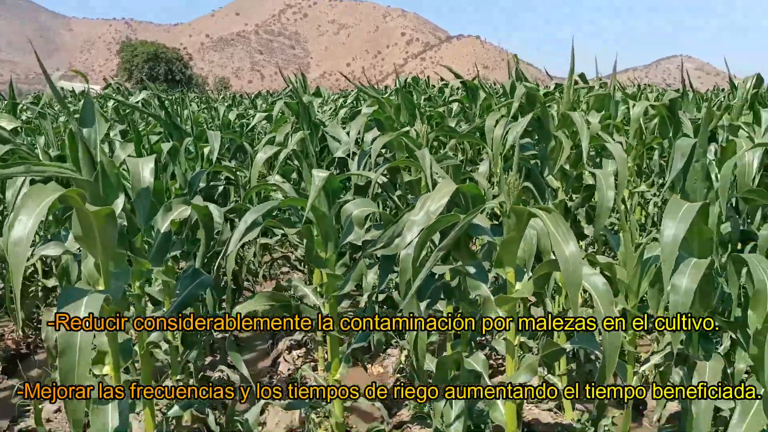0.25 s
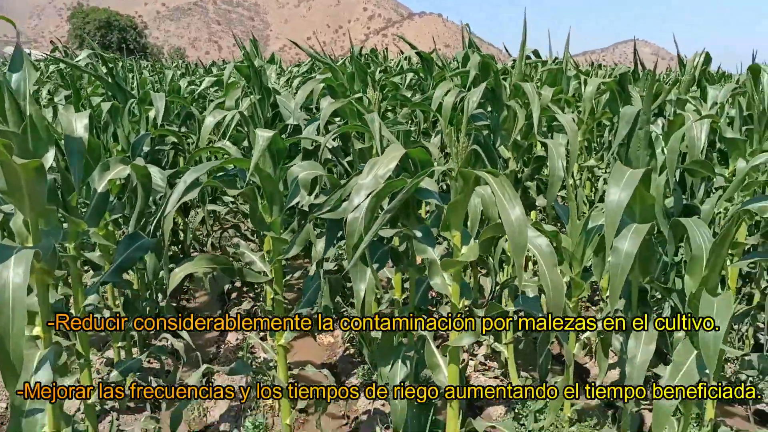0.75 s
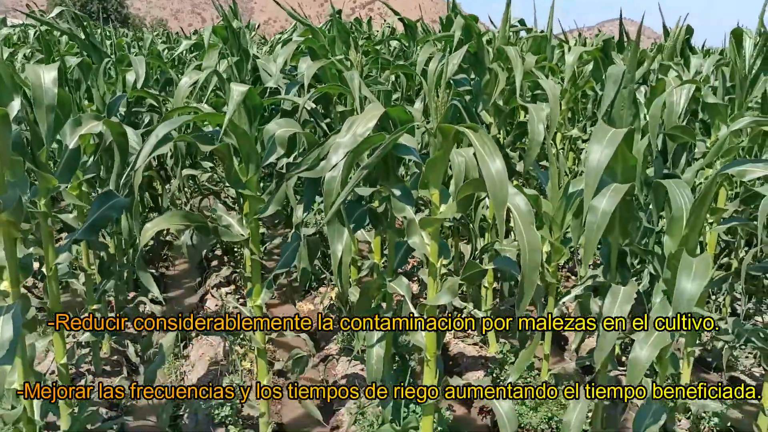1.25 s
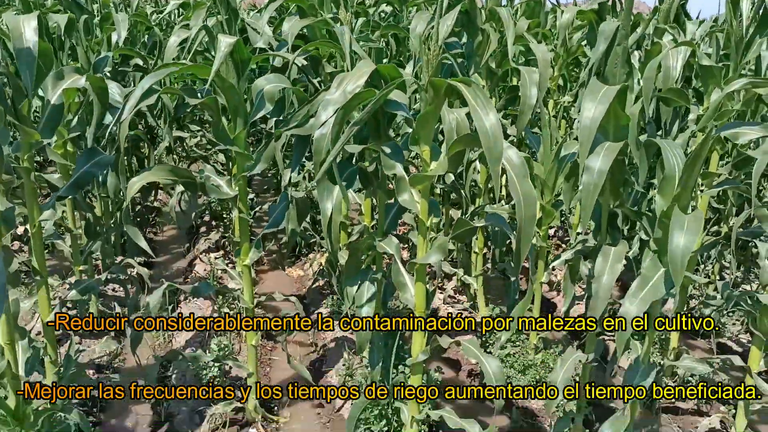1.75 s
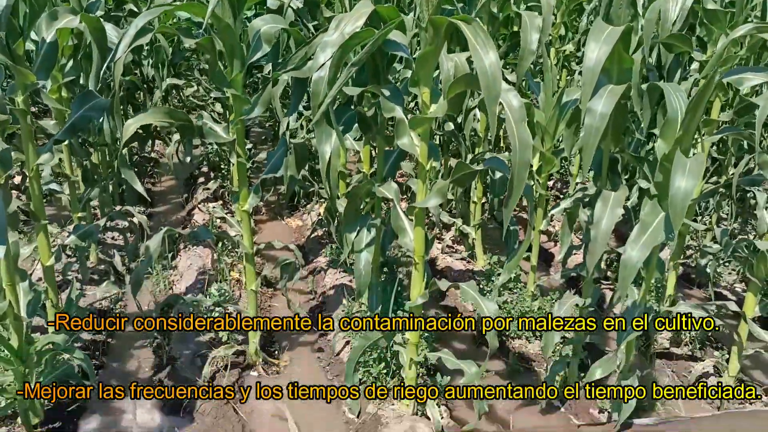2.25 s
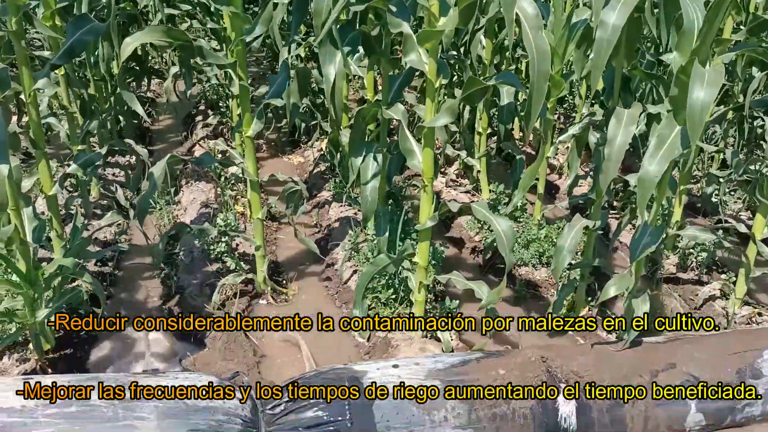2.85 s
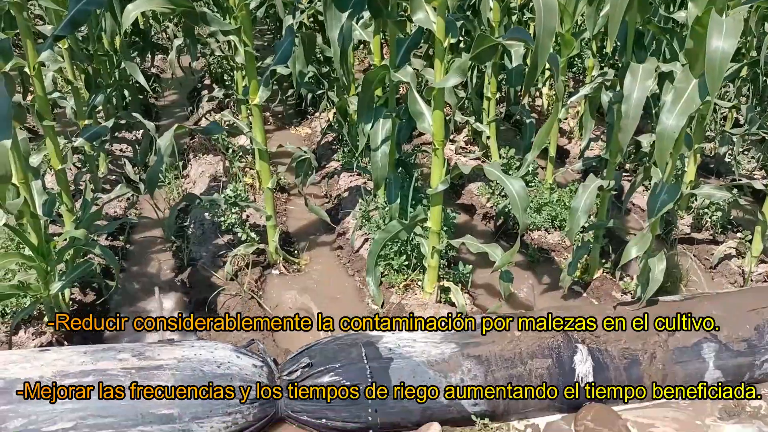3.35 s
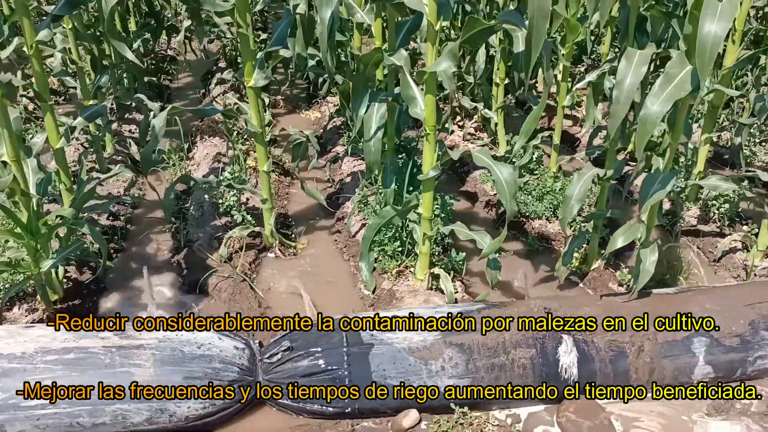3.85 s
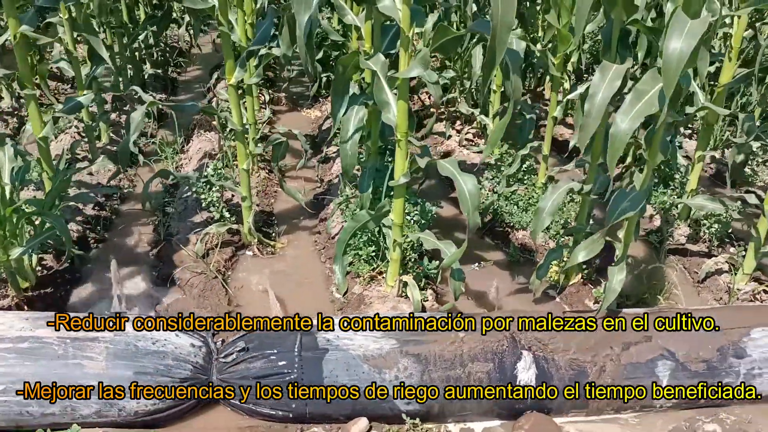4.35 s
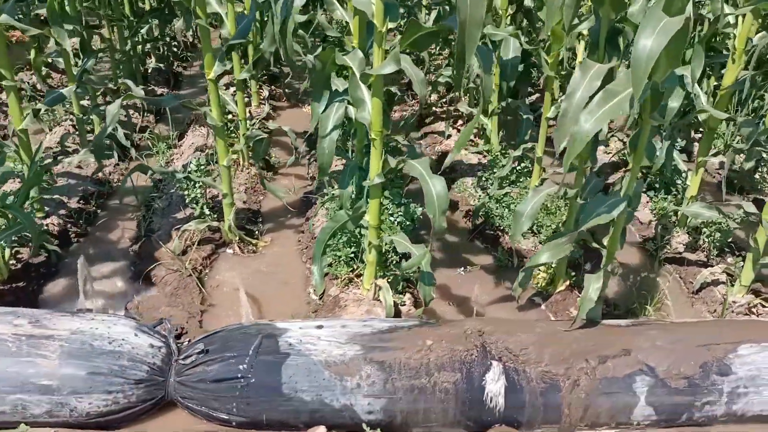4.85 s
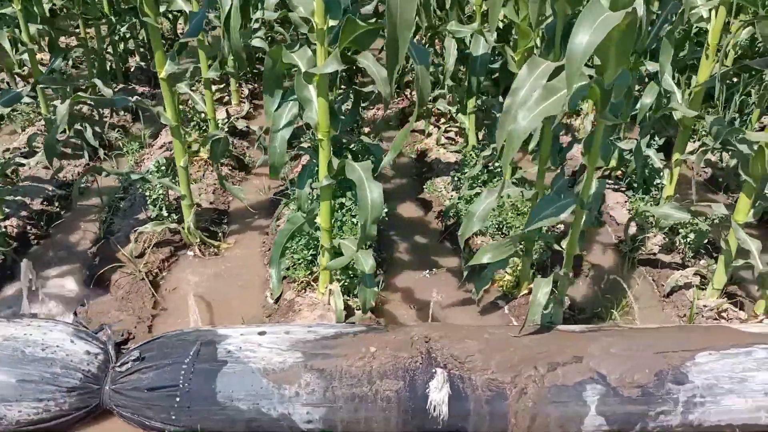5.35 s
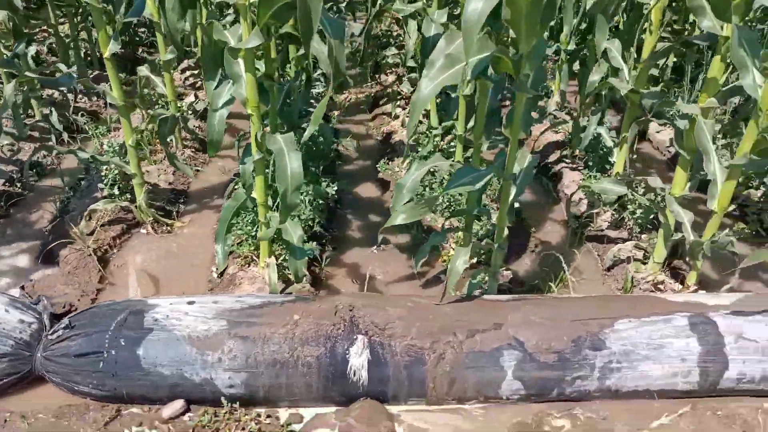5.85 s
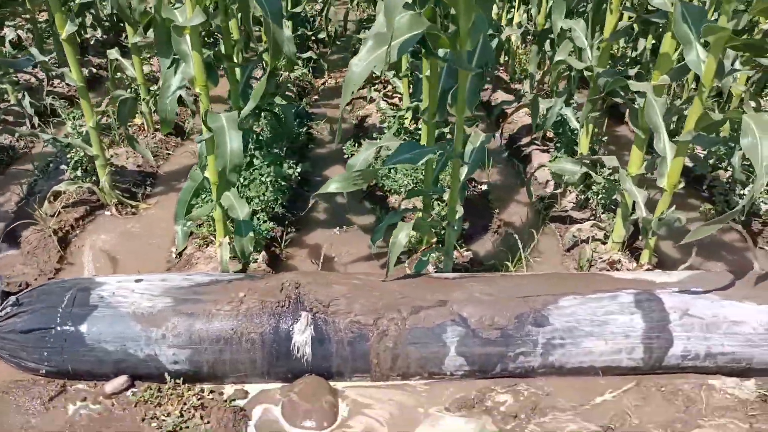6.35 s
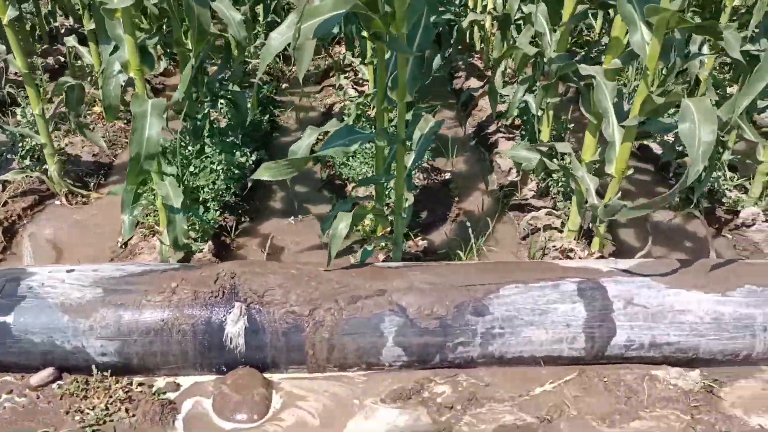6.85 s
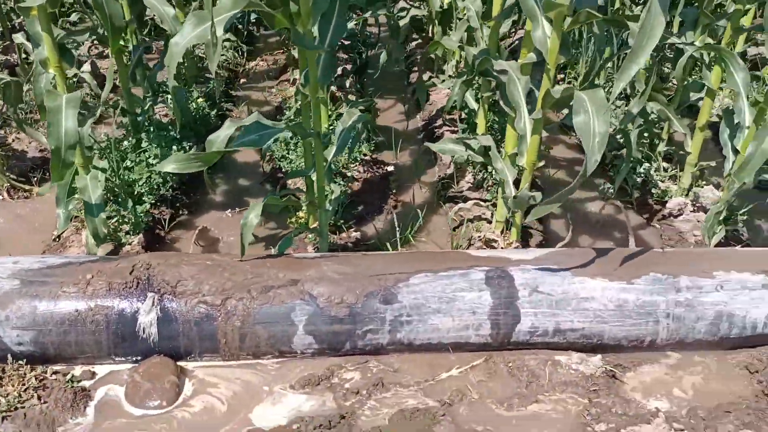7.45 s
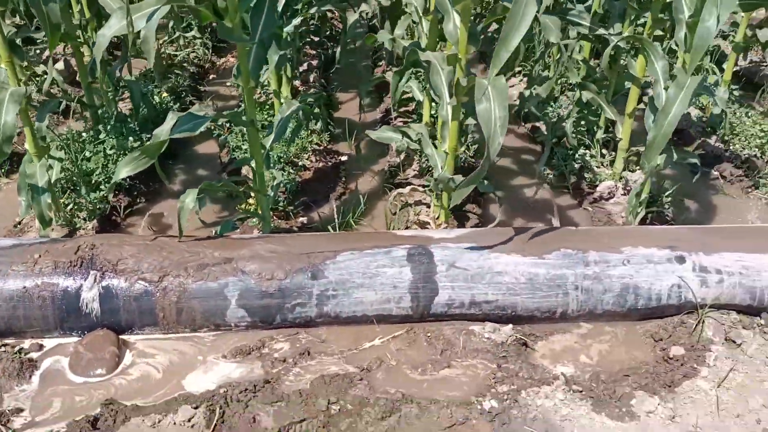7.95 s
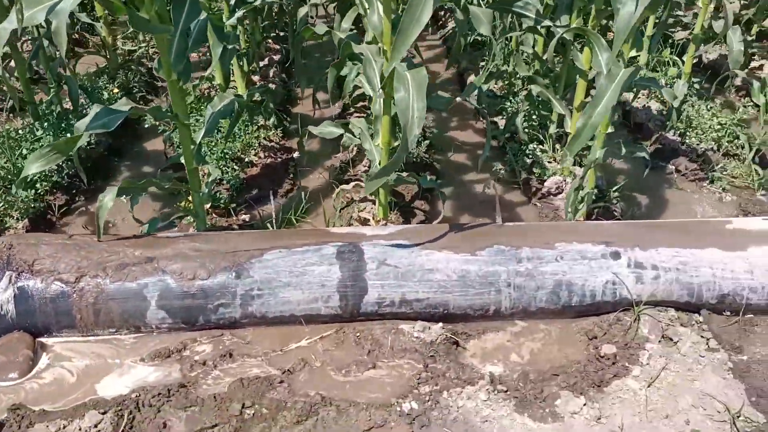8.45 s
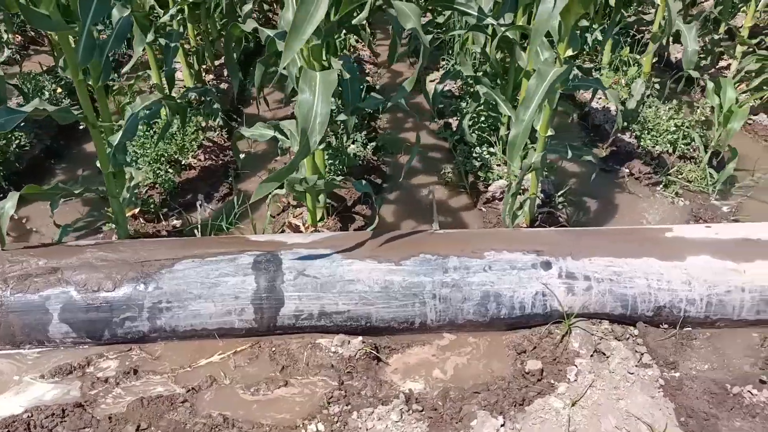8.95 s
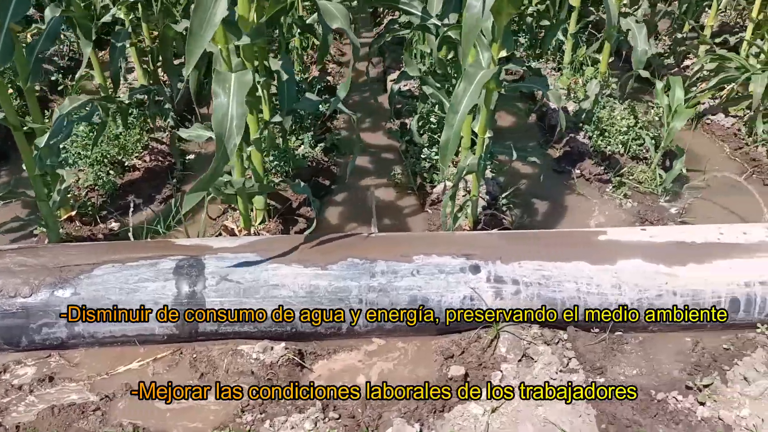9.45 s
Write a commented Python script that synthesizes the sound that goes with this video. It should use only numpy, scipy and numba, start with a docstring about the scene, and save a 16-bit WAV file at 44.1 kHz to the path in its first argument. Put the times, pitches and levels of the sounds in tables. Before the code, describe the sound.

Outdoors in a crop field, water streams continuously from a soft irrigation hose into wet furrows: a bright, fizzy hiss of jets over a dull gurgling wash. Sharp drops smack close to the handheld stereo microphone, mostly on the right. Light wind flutters early; just after the middle, strong gusts thump and rumble in the right channel, then ease while the water keeps running.

```python
"""Watering a maize field on a gusty day

Water runs from the outlets of a soft irrigation hose into the furrows of a maize field.
The jets hiss: shaped noise with tiny clicks, brief splats and small ringing bubbles.
The furrows gurgle with larger bubbles over a dull wash; single drops smack and bubbles plop nearby.
Gusts buffet the two ports of a hand-held microphone, mostly the right one: low rumble and short thumps.
"""
import sys
import numpy as np
from scipy import signal
from scipy.fft import rfft, irfft
from scipy.io import wavfile
from scipy.ndimage import uniform_filter1d
from numba import njit

SR = 44100
rng = np.random.default_rng(int(sys.argv[2]) if len(sys.argv) > 2 else 0)


def generate_wav(signal):
    """Clip the signal to [-1, 1] and save it as 16-bit WAV at the path in sys.argv[1]."""
    frames = np.transpose(np.atleast_2d(signal))
    scaled = np.clip(frames, -1, 1) * 32767
    pcm = np.round(scaled).astype(np.int16)
    wavfile.write(sys.argv[1], SR, pcm)


N = 428211
TIME = np.arange(N) / SR  # seconds
SHORT = 2048  # samples in one drop, splat or thump

# how loud the water is as nearness changes:
# (t/s, jets level/dB, furrows level/dB, extra left-port jets level/dB, finest spray level/dB)
NEARNESS = [(0, 0, 2, 1.5, 1), (1.5, .3, 1, 1.8, -0.1), (3, 0.5, 0.5, 0.6, 1), (4.2, 0.44, 1, 0, -0.5),
            (5.5, 0.5, 1.5, -1, 0.8), (7, 1, -2, -0.3, -1.8), (8.2, -0.06, -2, 0.1, -1),
            (9.35, 0.3, -4, 0, -2.5), (9.55, 1.5, -2.5, -.2, -1.5), (9.71, 1.5, -0.5, -1.5, -4)]
# splashing at each port, before nearness: (f/Hz, left level/dB per Hz, right level/dB per Hz)
SPLASH_SPECTRUM = [(300, -88.5, -83), (865, -83, -82.5), (1400, -79.5, -83), (1700, -76.5, -81),
                   (2160, -72, -74.5), (2450, -74, -78), (3050, -78, -72), (3750, -84, -76.5),
                   (4400, -79.5, -74), (4950, -85, -76), (5470, -75.5, -75.5), (5840, -85.5, -74),
                   (8820, -86, -79), (9600, -88.5, -87.5), (12000, -85.5, -84), (15300, -91, -91.5)]
# water tumbling in the furrows, before nearness: (f/Hz, level/dB per Hz)
FURROW_SPECTRUM = [(30, -75), (110, -85.5), (200, -75), (320, -81.5), (450, -78.5), (580, -77), (780, -80),
                   (1200, -87), (2500, -105)]
# gusts, each catching one port: (port, start t/s, length t/s, arrival level/dB, swell over the length/dB)
GUST_EVENTS = [("right", 0, .02, -37, 0), ("right", .12, .2, -32, 2), ("right", 0.452, .16, -42, 6),
               ("right", 1.24, 0.25, -37, -3.5), ("right", 1.77, .04, -44, 0),
               ("right", 2.99, 0.077, -42, 5), ("right", 3.36, .06, -47, 0), ("left", 3.43, 0.14, -43, 5),
               ("left", 3.6, .23, -48, 8), ("left", 3.94, 0.025, -33, 0), ("right", 4.32, 0.023, -35, 0),
               ("right", 4.445, .135, -30.5, 2), ("left", 4.47, .12, -37, -9),
               ("right", 4.68, .06, -35.5, -2), ("right", 4.93, .1, -43.5, -3),
               ("right", 5.19, .11, -35, 2.8), ("right", 5.395, .135, -17.5, 6.5),
               ("right", 5.56, .17, -17, -3), ("right", 5.77, .1, -11.5, -1), ("right", 5.9, .07, -17, -2),
               ("right", 6.022, .1, -15, -9), ("right", 6.16, .03, -11.5, -3), ("right", 6.24, .15, -24, 0),
               ("right", 6.415, .11, -14, -13), ("left", 6.46, .03, -36, 0), ("right", 6.59, .19, -26, 3),
               ("left", 6.87, 0.036, -24.5, 0), ("right", 6.87, .03, -37, 0),
               ("right", 7.075, .245, -21, 8), ("right", 7.385, .115, -17, 7),
               ("right", 7.53, .17, -15, -3), ("right", 7.73, .05, -16, 2), ("right", 7.86, .2, -23.5, -6),
               ("right", 8.43, .04, -33, 0), ("left", 8.43, 0.037, -26.5, -2),
               ("right", 8.57, .25, -33, 6.2), ("right", 8.88, 0.18, -31, -5),
               ("left", 8.85, 0.037, -29, 0), ("right", 9.13, 0.13, -31, -3), ("right", 9.38, .27, -36, 5),
               ("left", 9.61, .05, -41.5, 0)]
# light breeze between the gusts, right port: (t/s, level/dB)
RIGHT_BREEZE = [(0, -48), (1.1, -49.5), (2.3, -62), (3.1, -56), (4, -63), (5.2, -51), (8.25, -54),
                (9.71, -41)]
# tone of the eddies at a port, only the shape matters: (f/Hz, relative level/dB per Hz)
EDDY_SPECTRUM = [(8, -28), (25, -8), (50, 0), (75, 0), (100, 0), (170, -3), (250, -9.5), (330, -9.5),
                 (450, -9.5), (700, -16), (1500, -16)]
# the loudest nearby drops, as the right port hears them: (t/s, level/dB, f/Hz)
LOUD_DROPS = [(1.67, -15, 4280), (2.123, -21, 4860), (3.039, -12.5, 3980), (3.4, -15, 4460),
              (4.058, -21, 2720), (5.269, -16, 2470), (5.562, -19, 4470), (5.857, -17.5, 3050),
              (6.793, -16.5, 4500), (6.945, -13.3, 4360), (7.097, -19, 3060), (7.898, -17, 5640),
              (7.962, -15, 2810), (8.421, -19, 3570), (8.709, -17.5, 5580), (8.802, -17, 5480),
              (8.871, -16, 4400), (9.092, -20, 3800), (9.133, -16, 3560), (9.192, -22.5, 2610),
              (9.658, -16.5, 5000)]
# bigger bubbles in the nearest puddle: (t/s, starting level/dB, starting f/Hz)
PLOP_BUBBLES = [(.75, -28, 2180), (6.182, -27, 3520), (6.695, -29, 2490), (6.705, -32, 2750),
                (6.831, -33, 1430), (6.835, -29, 2070), (6.91, -33, 595), (7.303, -32, 1090),
                (8.54, -29.5, 1720), (9.1, -28, 2180), (9.189, -31.5, 597), (9.516, -29, 2490),
                (9.535, -31, 1860)]
# single strong eddies that thump the right port: (t/s, level/dB, f/Hz)
STRONG_EDDIES = [(4.571, -18, 130), (5.788, -2, 90), (5.832, 0.5, 110), (6.029, -5, 225), (6.175, -2, 130),
                 (6.316, -11, 128), (6.396, -15, 140), (6.429, -3, 205), (7.1, -4, 119), (7.151, -8, 93),
                 (7.216, -2.5, 99), (7.304, -2, 119), (7.482, 0.5, 100), (8.04, -12.5, 125),
                 (9.212, -15.5, 131), (9.456, -18, 125), (9.542, -18.5, 149)]

LEFT_BREEZE_DB = -59  # the left port is sheltered
GUST_ATTACK_S, GUST_RELEASE_S = 0.013, 0.028  # time constants of the rise and of the dying away
WAKE_DB, WAKE_S = -20, .16  # slack air behind a gust: level against the gust, time constant
DROP_RING_CYCLES = 2.54  # a drop's ring falls to 1/e in this many cycles
PLOP_RING_S = 0.027  # how long each plop rings
TOP_HZ = 15300  # the recorder cuts what lies above


def undb(db):
    """Turn decibels into a multiplier."""
    return 10 ** (np.asarray(db) / 20)


def unit(x):
    """Scale to an average strength (rms) of one."""
    return x / np.sqrt(np.mean(x ** 2))


def curves(rows):
    """Draw each column of a timed table as a line, sample by sample."""
    s, *columns = np.transpose(rows)
    return [np.interp(TIME, s, column) for column in columns]


def walk(rate):
    """Wander smoothly at random, with about `rate` turns a second and an rms of one."""
    k = max(int(SR / rate), 2)
    steps = np.repeat(rng.standard_normal(N // k + 1), k)
    smooth = uniform_filter1d(uniform_filter1d(steps, k), k)
    return unit(smooth[:N])


def colour(x, hz, db):
    """Give white sound of rms one a spectrum in dB per Hz."""
    f = np.arange(N // 2 + 1) * SR / N + 1  # the extra 1 Hz avoids log(0)
    gain = undb(np.interp(np.log(f), np.log(hz), db))
    return irfft(rfft(x) * gain, N) * np.sqrt(SR / 2)


def add(track, s, sound):
    """Mix a short sound in at time s."""
    i = int(np.clip(s * SR, 0, N - 1))
    track[i:i + len(sound)] += sound[:N - i]


@njit
def lowpass(x, hz, damping):
    """Keep what lies below a corner that can move (state-variable filter)."""
    y, band, low = np.empty(len(x)), 0., 0.
    for i in range(len(x)):
        g = np.tan(np.pi * hz[i] / SR)
        v = (band + g * (x[i] - low)) / (1 + g * (g + damping))
        y[i] = low + g * v
        band, low = 2 * v - band, 2 * y[i] - low
    return y


@njit
def ring(starts, hz, cycles, size, glide):
    """Bubbles ring as fading sines that rise in pitch as they near the surface."""
    y = np.zeros(N)
    for k in range(len(starts)):
        length = int(cycles[k] * SR / hz[k])
        phase, level, fade = 0., size[k], np.exp(-5.5 / length)
        for j in range(length):
            i = int(starts[k] * SR) + j
            phase += 2 * np.pi * hz[k] * (1 + glide * j / length) / SR
            level *= fade
            if 0 <= i < N:
                y[i] += level * np.sin(phase)
    return y


def bubbles(count, low_hz, high_hz, cycles, spread_db, lag_ms, scatter_ms, glide):
    """A cloud of bubbles, many faint and a few strong, each reaching the left port a little late."""
    when, pitch, life, strength, place = rng.random((count, 5)).T
    hz = low_hz * (high_hz / low_hz) ** pitch
    size = undb(-spread_db * np.log(1 - .995 * strength)) * hz  # equal power per Hz
    late = (lag_ms + scatter_ms * (2 * place - 1)) / 1000
    turns = max(cycles, 1.) * (.5 + life)
    starts = when * N / SR
    left = ring(starts + late, hz, turns, size, glide)
    right = ring(starts, hz, turns, size, glide)
    return unit(np.array([left, right]))


def splats(count=330, spread_db=2.0, fade_s=0.017, low_hz=2500, high_hz=13500):
    """Gobs of water land here and there, each a brief hiss with a pitch of its own."""
    out, t = np.zeros((2, N)), TIME[:SHORT]
    for when, pitch, strength in rng.random((count, 3)):
        hz = min(low_hz * (high_hz / low_hz) ** pitch, 14000)
        band = signal.butter(1, [hz * 3 / 4, hz * 4 / 3], "bandpass", fs=SR)
        burst = signal.lfilter(*band, rng.standard_normal((2, SHORT))) * np.exp(-t / fade_s)
        burst *= undb(-spread_db * np.log(1 - .97 * strength))  # a few are strong
        for port, sound in zip(out, burst):
            add(port, when * N / SR, sound)
    return unit(out)


def jets(impact_db=-5, fizz_db=-7.5, hiss_db=-3, splat_db=-10, direct_db=-4,
         surge_db=0.29, flutter_db=0.25, lag_s=0.00045):
    """The jets break up: tiny impacts, splats and ringing bubbles over a smooth hiss, surging slightly."""
    impacts = (rng.random((2, N)) < .08) * rng.standard_normal((2, N))
    fizz = bubbles(count=13000, low_hz=996.0, high_hz=13430, cycles=51, spread_db=3.0,
                   lag_ms=.6, scatter_ms=.4, glide=0.11)
    # the nearest jet reaches both ports, the right one first
    low = signal.butter(2, 2400, fs=SR, output="sos")
    jet = signal.sosfilt(low, rng.standard_normal(N))
    direct = np.array([np.interp(TIME - lag_s, TIME, jet), jet])
    water = undb(impact_db) * unit(impacts) + undb(fizz_db) * fizz + undb(splat_db) * splats()
    water += undb(hiss_db) * rng.standard_normal((2, N)) + undb(direct_db) * direct
    water = unit(water * undb(surge_db * walk(14) + flutter_db * walk(110)))
    hz, *ports = np.transpose(SPLASH_SPECTRUM)
    return np.array([colour(w, hz, db) for w, db in zip(water, ports)])


def furrows(gurgle_db=-1, wash_db=-5, diffuse=0.12, lag_s=0.00016):
    """Large bubbles gurgle where the water falls into the furrows, over a dull wash."""
    gurgle = bubbles(count=2600, low_hz=286.3, high_hz=1480, cycles=14.2, spread_db=3.0,
                     lag_ms=0.17, scatter_ms=0.14, glide=0.093)
    gurgle *= np.sqrt(2400 / SR)  # a narrow band needs less power for the same dB per Hz
    flow = rng.standard_normal(N)
    wash = np.array([np.interp(TIME - lag_s, TIME, flow), flow])
    wash += diffuse * rng.standard_normal((2, N))  # a part that differs between the ports
    return colour(undb(gurgle_db) * gurgle + undb(wash_db) * wash, *np.transpose(FURROW_SPECTRUM))


def gusts(port, breeze_db):
    """Wind strength at one port in dB: gusts arrive fast, swell or sag, and die away into their wakes."""
    force = undb(breeze_db) * np.ones(N)
    for side, start, length, db, swell_db in GUST_EVENTS:
        if side == port:
            before = np.maximum(start - TIME, 0)
            after = np.maximum(TIME - start - length, 0)
            rise = np.exp(-before / GUST_ATTACK_S)
            hold = undb(db + swell_db * np.clip((TIME - start) / length, 0, 1))
            wake = undb(WAKE_DB) * np.exp(-after / WAKE_S)
            release = np.maximum(np.exp(-after / GUST_RELEASE_S), wake)
            force = np.maximum(force, rise * hold * release)  # the strongest wind wins
    return 20 * np.log10(force)


def wind(gust_db, corner_hz, trim_db, churn_db=2.5, octave_db=10, flutter_db=1.1):
    """Turbulence at one port: stronger gusts have smaller eddies, so the rumble reaches higher."""
    force_db = gust_db + churn_db * walk(70) + flutter_db * walk(22)
    eddies = colour(rng.standard_normal(N), *np.transpose(EDDY_SPECTRUM))
    corner = np.clip(corner_hz * (1 + 2 ** ((force_db + 18) / octave_db)), 60, 490)
    rumble = lowpass(lowpass(eddies, corner, 1.46), corner, 1.0)
    # even out the rumble over each twentieth of a second, so that the gust sets its strength
    rumble /= np.sqrt(uniform_filter1d(rumble ** 2, size=SR // 20) + 1e-12)
    return rumble * undb(force_db + trim_db)


def drops(left_db=-10, lag_s=0.000793, smack=0.27, smack_s=0.0012, spray=.11, spray_s=0.013,
          count=26, faint_db=-24, faint_spread_db=2, faint_hz=4200, faint_octaves=.45):
    """Each drop smacks, rings and throws a little spray; fainter ones fall at random; the left is shaded."""
    out, t = np.zeros((2, N)), TIME[:SHORT]
    wet = signal.butter(2, [1500, 7500], "bandpass", fs=SR, output="sos")
    faint = []
    for when, size, pitch in rng.random((count, 3)):
        db = faint_db + faint_spread_db * (2 * size - 1)
        hz = faint_hz * 2 ** (faint_octaves * (2 * pitch - 1))
        faint.append((when * N / SR, db, hz))
    for s, db, hz in list(LOUD_DROPS) + faint:
        tone = np.sin(2 * np.pi * hz * t) * np.exp(-hz * t / DROP_RING_CYCLES)
        fade = smack * np.exp(-t / smack_s) + spray * np.exp(-t / spray_s)
        splash = unit(signal.sosfilt(wet, rng.standard_normal(SHORT))) * fade
        add(out[0], s + lag_s, undb(db + left_db) * (tone + splash))
        add(out[1], s, undb(db) * (tone + splash))
    return out


def plops(glide=0.27, lag_s=.0001):
    """Large lone bubbles ring and rise in pitch, almost straight ahead."""
    s, db, hz = np.array(PLOP_BUBBLES, float).T.copy()
    return np.array([ring(s + lag, hz, PLOP_RING_S * hz, undb(db), glide) for lag in (lag_s, 0)])


def thumps(turns=0.43, core_db=-15, core_hz=370):
    """A lone vortex crosses the port: one short swing of pressure, steepened by a tight core of fixed size."""
    out = np.zeros(N)
    t = TIME[:SHORT] - TIME[SHORT // 2]  # zero in the middle of the swing

    def swing(hz):
        """One pressure swing under a bell-shaped fade."""
        return np.sin(2 * np.pi * hz * t) * np.exp(-(hz * t / turns) ** 2)

    for s, db, hz in STRONG_EDDIES:
        add(out, s + t[0], undb(db) * (swing(hz) + undb(core_db) * swing(core_hz)))
    return out


def scene(spray_hz=8500):
    """Water ahead and to the right, wind on each port by itself."""
    jets_db, furrows_db, left_db, spray_db = curves(NEARNESS)
    splashing = jets() * undb([jets_db + left_db, jets_db])
    # the finest spray is directional: its level shifts as the microphone turns
    high = signal.butter(2, spray_hz, "high", fs=SR, output="sos")
    spray = signal.sosfiltfilt(high, splashing)
    water = splashing + (undb(spray_db) - 1) * spray + furrows() * undb(furrows_db)
    left = wind(gusts("left", LEFT_BREEZE_DB), corner_hz=158, trim_db=0)
    right = wind(gusts("right", curves(RIGHT_BREEZE)[0]), corner_hz=162.5, trim_db=-0.4)
    water += drops() + plops()
    return water + np.array([left, right + thumps()])


def record(dry):
    """The recorder rounds off the hardest buffets and cuts the top."""
    top_cut = signal.ellip(10, .2, 80, TOP_HZ, fs=SR, output="sos")
    return signal.sosfilt(top_cut, np.tanh(dry))


dry = scene()
out = record(dry)
generate_wav(out)
```